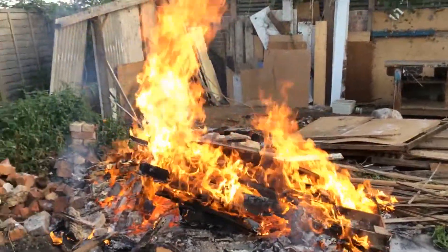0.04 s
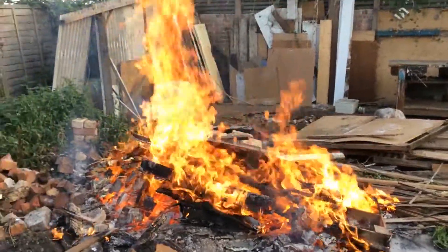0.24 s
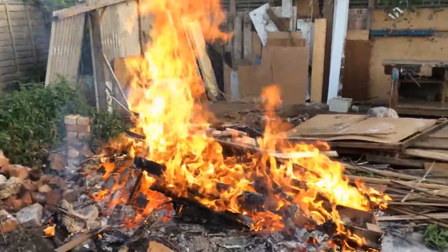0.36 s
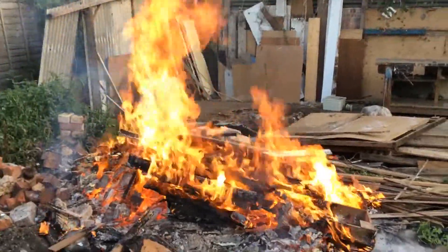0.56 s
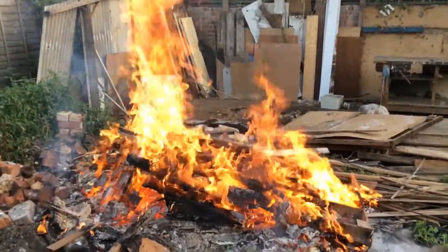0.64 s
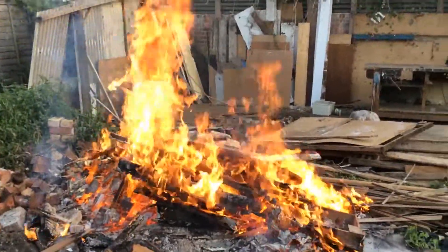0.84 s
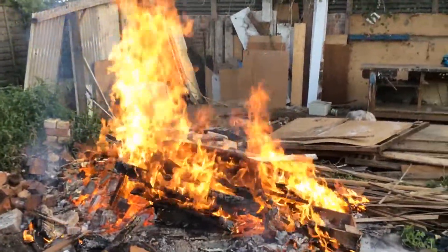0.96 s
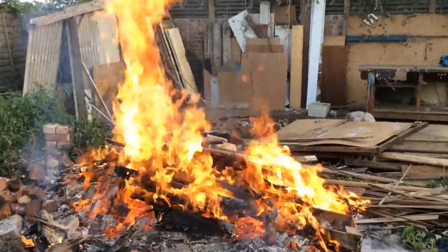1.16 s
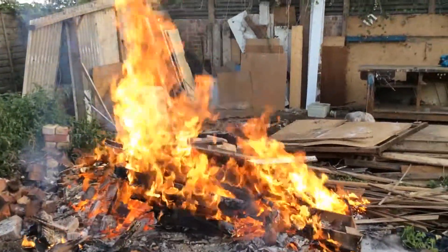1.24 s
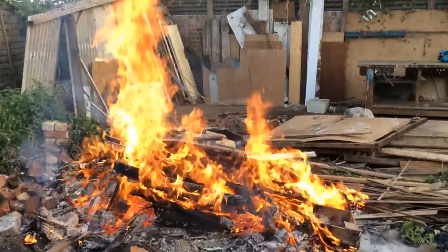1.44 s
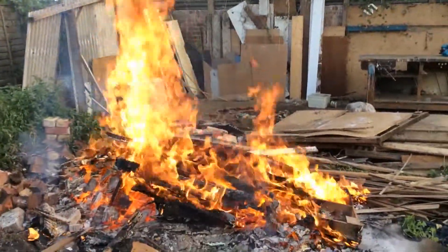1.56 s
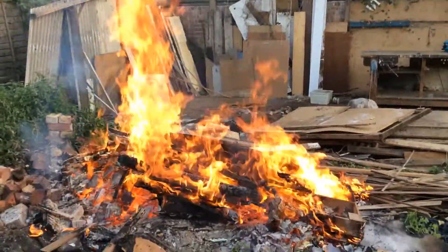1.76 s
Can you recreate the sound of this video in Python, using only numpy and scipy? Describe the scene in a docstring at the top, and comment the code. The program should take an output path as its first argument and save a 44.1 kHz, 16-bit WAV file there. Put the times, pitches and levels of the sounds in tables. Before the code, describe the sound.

A wood bonfire crackles outdoors with sharp, irregular snaps and pops.

```python
"""A bonfire of scrap wood in a yard, one microphone a few steps away.
From the start, gas and steam pockets burst in the boards as snaps over crackle, hiss and flame rumble.
The loudest come early, overloading the microphone and ducking its gain; a hollow pop follows from deep
in the pile. After a last hard crack at about one second, the snaps are weaker and the hiss sinks.
Throughout, nearby walls and stacked boards throw every snap back."""
import sys
import numpy as np
from scipy import signal
from scipy.fft import rfft, irfft
from scipy.io import wavfile

SR = 44100
rng = np.random.default_rng(int(sys.argv[2]) if len(sys.argv) > 2 else 0)


def master_out(mix):
    """Clip the mix to full scale and print it as 16-bit PCM to the path in sys.argv[1]."""
    frames = np.transpose(np.atleast_2d(mix))
    ceiling = np.clip(frames, -1, 1)
    pcm = np.round(ceiling * 32767).astype(np.int16)
    wavfile.write(sys.argv[1], SR, pcm)


N = 79380

# Rise and fall of hiss and crackle together: time_s, level_db
FIZZ_LEVEL = [(0, -1.5), (.15, 0), (.5, -2), (.62, 2), (.8, -2.5), (1.02, 3.5), (1.25, -3.5), (1.45, -3),
              (1.62, -6), (1.8, 0)]


def snaps(puff_hz=164, puff_db=-25.5):
    """Snaps, each a crack and a low puff of gas, and a few distinct wall echoes of the snap just before."""
    # Snaps, and distinct wall echoes at 0.052, 0.4238 and 1.016 s:
    # start_s, level_db, pitch_hz, resonance_q, splinter_db (re the release), echo_db
    snaps_and_echoes = [ (0.039, -13, 3140, 0.84, 21, -3), (0.052, -21, 6500, 5.4, 16, -28),
                        (.0850, -34, 3500, 0.5, 14, 11.5), (0.102, -29, 2760, 0.84, 15, -3),
                        (.1190, -28, 9000, 0.66, 2, 3.5), (.1400, -33, 9000, 1.4, -4, 1),
                        (0.151, -14.5, 6300, 0.57, 22, -1), (0.2365, 7, 10460, 0.84, -12, -5),
                        (0.2601, -3.5, 8500, 1.3, -1, -5), (0.303, -23.5, 9600, 1.4, -8, -1),
                        (0.3232, -5, 3580, 3, -12.5, -7), (0.3235, -7, 7900, 1.2, 14, -2.5),
                        (0.3239, -21, 900, 0.9, -15, -5), (0.4084, -8.5, 12000, 0.5, 10, -5.5),
                        (0.4183, 3, 11700, 0.67, -0.5, -3.5), (0.4184, -9, 2260, 0.74, -7, -4.5),
                        (0.4186, -20.5, 130, 0.6, -16, -8.5), (0.4238, -4, 9350, 1.6, 17, -21),
                        (0.4756, -15.5, 7350, 0.56, 11, -16), (0.4807, -14, 3000, 0.46, 16, -4.5),
                        (0.5009, -17, 7200, 0.45, 9, -0.5), (0.529, -27.5, 6040, 0.61, -12, -6),
                        (0.57, -28, 6400, 0.82, 2, -3), (0.6725, -17, 5700, 0.75, -4, 1),
                        (0.7324, 0.5, 7100, 1.6, -7, -6), (0.842, -26.5, 3740, 0.55, 12, 5),
                        (.8970, -18.5, 5800, 1.1, 7, -6), (0.945, -40, 6000, 0.58, -5, -3),
                        (0.9956, -17, 10000, 0.3, 1, -3), (0.9985, -12.5, 11900, 1.3, 5, 0),
                        (1.0105, -14, 2420, 0.66, -4.5, -2), (1.016, -24, 3300, 0.66, -1, -20),
                        (1.0366, -28.5, 2800, 0.78, -8, 1), (1.0490, -9, 11000, 1, -22, -5),
                        (1.0893, 3, 7830, 0.74, -12, 0.5), (1.2370, -34.5, 4100, 1.5, 6, -1),
                        (1.3075, -31, 8500, 0.6, 16, -1), (1.389, -11.5, 5400, 0.46, 19, -2.5),
                        (1.4055, -20, 9000, 0.7, 4, -14), (1.5025, -14, 4260, 0.69, 20, -2.5),
                        (1.5396, -23, 8000, 0.87, 14, 3.5), (1.5463, -18.5, 7900, 1.3, 18, -17),
                        (1.5874, -20.5, 8300, 0.47, 10, 0), (1.6193, -23, 10000, 0.47, 8, -15),
                        (1.6819, -24, 8950, 0.75, 4, -10), (1.6988, -14.5, 10400, 0.84, 1, -3.5),
                        (1.7520, -26, 6240, 0.33, 4, -1), (1.765, -25, 5200, 0.64, 21, -3)]
    out = np.zeros(N)
    puff = amp(puff_db) * ring(puff_hz, q=0.22)
    for start_s, level_db, hz, q, splinter_db, echo_db in snaps_and_echoes:
        splinter_s = 0.0007 * 2 ** (-level_db / 16)  # strong ones are short, weak ones last longer
        sound = amp(level_db) * (burst(hz, q, splinter_db, splinter_s) + puff)
        ringing = amp(level_db) * (ring(hz, q) + puff)
        add(out, start_s, sound)
        add(out, start_s, amp(echo_db) * yard(sound, ringing))
    return out


def burst(hz, q, splinter_db, splinter_s, rise_s=0.00025, size=1024):
    """One sharp release and a spray of breaking fibres, heard through the cavity."""
    t = np.arange(size) / SR
    spray = np.exp(-t / splinter_s) * (1 - np.exp(-t / rise_s))
    phases = np.angle(rfft(rng.standard_normal(size) * spray))
    fibres = irfft(np.exp(1j * phases)) * spray ** .5  # even across the spectrum
    release = signal.unit_impulse(size)
    return cavity(release + amp(splinter_db) * unit(fibres), hz, q)


def cavity(drive, hz, q):
    """A damped resonance in the wood, scaled to energy 1."""
    size = len(drive)
    s = 1j * np.fft.rfftfreq(2 * size, 1 / SR) / hz
    bandpass = s / (1 + s / q + s * s)
    padded = np.pad(drive, (4, size - 4))
    return unit(irfft(rfft(padded) * bandpass)[:size])


def ring(hz, q, size=1024):
    """The cavity's answer to one sharp release."""
    return cavity(signal.unit_impulse(size), hz, q)


def pop(start_s=0.5409, gain_db=-18.5, echo_db=-1.5, dull_hz=3000):
    """A larger pocket rings a hollow among the boards, deep in the pile."""
    # Resonances of the hollow: pitch_hz, level_db, resonance_q
    modes = [(265, -1.5, 1.1), (860, 0.5, 2.7), (2200, -7.5, 10)]
    hollow = amp(gain_db) * sum(amp(db) * ring(hz, q) for hz, db, q in modes)
    muffled = signal.lfilter(*signal.butter(1, dull_hz, fs=SR), hollow)
    out = np.zeros(N)
    add(out, start_s, muffled)
    add(out, start_s, amp(echo_db) * yard(muffled, muffled))
    return out


def yard(sound, ringing, onset_s=0.0016, rise_s=0.0022, size=10240):
    """The walls slap the sound back; its ringing scatters briefly among the stacked timber."""
    # Hard surfaces nearby: delay_s, mirror_db, scatter_db, scatter_s
    walls = [(.0057, -6.5, -6.5, 0.0028), (0.0134, -15.5, -27, 0.0021)]
    # Time the tail takes to fall 60 dB: frequency_hz, decay_s
    decay_times = [(300, 0.091), (2000, 0.16), (6000, 0.18), (15000, 0.18)]
    # Tone of the scattered echo: frequency_hz, gain_db
    echo_tone = [(200, -2), (1500, -3), (3500, -4), (7000, -2), (15000, -4.5)]
    t = np.arange(size) / SR
    grains = rng.standard_normal(size) * rng.exponential(1, size) ** .5
    hz, frame_s, bands = signal.stft(grains, SR, nperseg=256)
    decay = amp(-60 * frame_s / value_at(decay_times, hz)[:, None])
    tail = signal.istft(bands * decay, SR)[1][:size]
    echo = unit(tail * np.clip((t - onset_s) / rise_s, 0, 1))
    slaps = np.zeros(len(ringing) + size - 1)
    for delay_s, mirror_db, scatter_db, scatter_s in walls:
        add(slaps, delay_s, amp(mirror_db) * sound)
        scatter = unit(rng.standard_normal(size) * np.exp(-t / scatter_s))
        add(echo, delay_s, amp(scatter_db) * scatter)
    return slaps + signal.fftconvolve(ringing, colour(echo, echo_tone))


def crackle(per_s=330, gain_db=-46.5, spread_db=5.0, voices=20):
    """Countless tiny snaps of bark and embers, at random times."""
    # Resonances of the tiny snaps: pitch_hz
    pitches = [3000, 5500, 8500, 11000, 12600]
    out = np.zeros(N)
    for k in range(voices):
        sizes = amp(spread_db * np.minimum(rng.exponential(1, N), 2.8))
        hits = sizes * (rng.random(N) < per_s / voices / SR)
        tick = burst(pitches[k % len(pitches)], q=0.87, splinter_db=0.5, splinter_s=0.0015)
        out += signal.oaconvolve(hits, tick)[:N]
    return amp(gain_db) * out * curve(FIZZ_LEVEL)


def flames(gain_db=-56, flutter_db=1.0, rumble_top_hz=119):
    """Turbulent burning gas: a low rumble under a soft, swelling roar."""
    # Spectrum of the flames: frequency_hz, relative_db
    spectrum = [(20, -16), (40, -12), (52, -4), (67, -4), (100, -7.5), (140, -4), (195, -4.5), (280, -9),
                (550, -14.5), (1000, -10.5), (1600, -24.5), (4000, -52), (16000, -59)]
    # Swell of their bass: time_s, level_db
    rumble_level = [(0, -4), (.4, 0.5), (.6, -0.5), (.9, -1.5), (1.2, -2), (1.38, 0), (1.8, 1)]
    # Swell of their midrange: time_s, level_db
    roar_level = [(0, 1), (.45, 0), (.62, 1.5), (.95, 1), (1.35, -3), (1.8, 0.5)]
    gas = amp(gain_db + flutter_db * wander(rate_hz=28)) * noise(spectrum)
    rumble = signal.sosfiltfilt(signal.butter(2, rumble_top_hz, fs=SR, output="sos"), gas)
    roar = gas - rumble
    return rumble * curve(rumble_level) + roar * curve(roar_level)


def hiss(gain_db=-59, flicker_db=0.8):
    """Steam escaping from the boards, flickering."""
    # Spectrum of the steam: frequency_hz, relative_db
    spectrum = [(500, 3.5), (1500, 12), (3000, 3.5), (7000, 4), (12000, 0.5), (16000, 11.5)]
    return amp(gain_db + flicker_db * wander(rate_hz=180)) * noise(spectrum) * curve(FIZZ_LEVEL)


def drone(pitch_hz=68, waver_hz=2.5, gain_db=-64, flutter_db=2):
    """A deep, unsteady drone under the flames."""
    # Swell of the drone: time_s, level_db
    swell = [(0, -3.5), (.4, 1), (.65, -2), (.9, 0.5), (1.15, 2.5), (1.37, 4), (1.6, -2), (1.8, 0.5)]
    cycles = np.cumsum(pitch_hz + waver_hz * wander(rate_hz=12)) / SR
    tone = np.sqrt(2) * np.sin(2 * np.pi * cycles)
    return amp(gain_db + flutter_db * wander(rate_hz=9)) * tone * curve(swell)


def amp(db):
    """Decibels to gain."""
    return 10 ** (np.asarray(db) / 20)


def unit(x):
    """Scales to energy 1."""
    return x / np.sqrt(np.sum(x ** 2) + 1e-20)


def value_at(points, hz):
    """Interpolates a table on a log-frequency axis."""
    f, value = np.transpose(points)
    return np.interp(np.log(hz + 1), np.log(f + 1), value)


def curve(points):
    """A level curve as a gain for every sample."""
    return amp(np.interp(np.arange(N) / SR, *np.transpose(points)))


def add(mix, start_s, sound):
    """Mixes a sound in at its start time."""
    part = mix[round(start_s * SR):][:len(sound)]
    part += sound[:len(part)]


def colour(x, points):
    """Filters by a spectrum."""
    size = 2 * len(x)
    gain = amp(value_at(points, np.fft.rfftfreq(size, 1 / SR)))
    return irfft(rfft(x, size) * gain)[:len(x)]


def noise(points):
    """Noise of rms 1 with the given spectrum."""
    return unit(colour(rng.standard_normal(N), points)) * np.sqrt(N)


def wander(rate_hz):
    """Random drift of rms 1, from 2 Hz up, rolling off above rate_hz."""
    hz = np.fft.rfftfreq(N, 1 / SR)
    band = (hz > 2) / (1 + (hz / rate_hz) ** 2)
    return unit(irfft(rfft(rng.standard_normal(N)) * band, N)) * np.sqrt(N)


def scene():
    """The whole fire from a few steps away; the fine crackle shares one echo."""
    embers = crackle()
    ember_echo = amp(-10) * yard(embers, embers)[:N]
    return (flames() + drone() + hiss() + embers + ember_echo + pop() + snaps())[None]


def record(dry, ceiling=0.75, duck_s=0.026, threshold_db=-32.5, duck_share=0.39, recover_db_per_s=16):
    """The microphone overloads on the loudest snaps; its gain ducks and recovers slowly."""
    # Microphone response: frequency_hz, gain_db
    response = [(20, 2), (5000, 0.5), (12000, 2.5), (15000, 3.5), (15400, -30), (15700, -31), (17000, -24)]
    clipped = ceiling * np.tanh(dry[0] / ceiling)
    pole = np.exp(-1 / (duck_s * SR))
    smoother = [1 - pole], [1, -pole]
    power_db = 10 * np.log10(signal.lfilter(*smoother, clipped ** 2) + 1e-12)
    fall_db = np.arange(N) * recover_db_per_s / SR
    held_db = np.maximum.accumulate(power_db + fall_db) - fall_db  # holds each peak and lets it sink
    over_db = np.maximum(held_db - threshold_db, 0)
    duck_db = duck_share * signal.lfilter(*smoother, over_db)
    coloured = colour(clipped / amp(duck_db), response)
    band_limit = signal.firwin(511, cutoff=16570, window=("kaiser", 9), fs=SR)
    return signal.oaconvolve(coloured, band_limit, "same")[None]


dry = scene()
out = record(dry)
master_out(out)
```